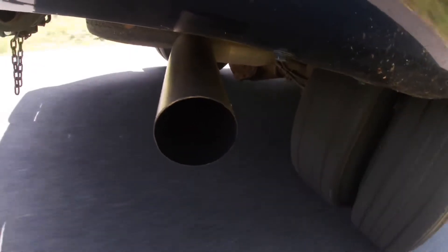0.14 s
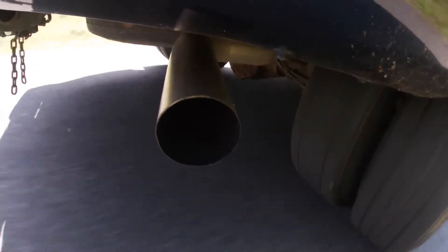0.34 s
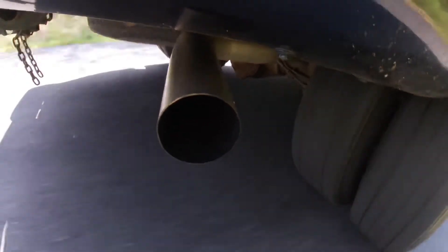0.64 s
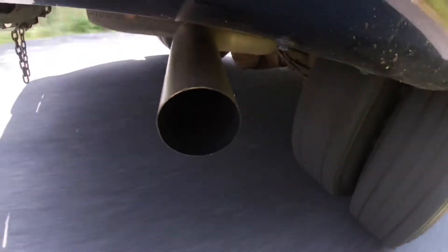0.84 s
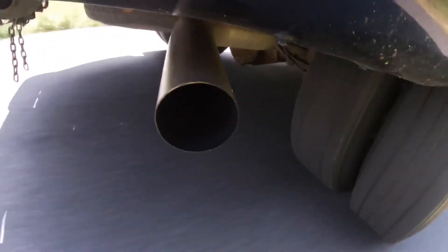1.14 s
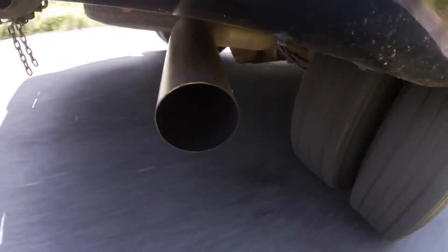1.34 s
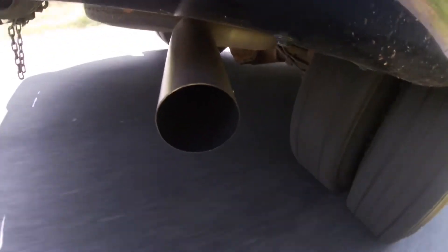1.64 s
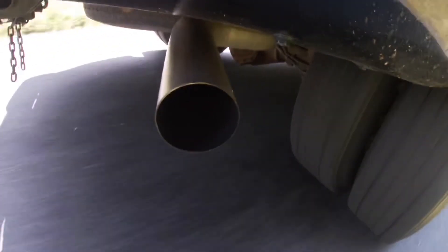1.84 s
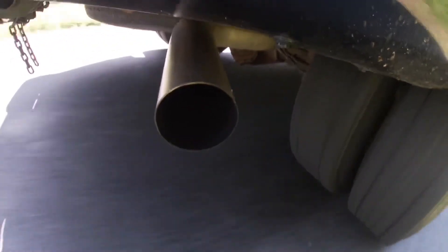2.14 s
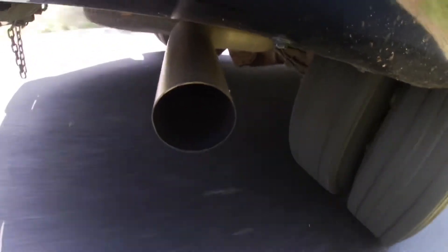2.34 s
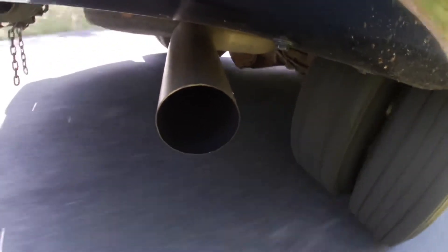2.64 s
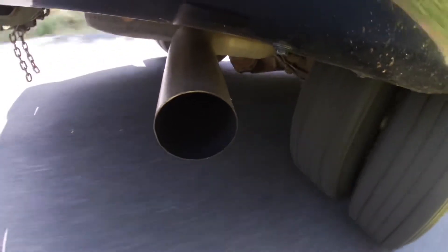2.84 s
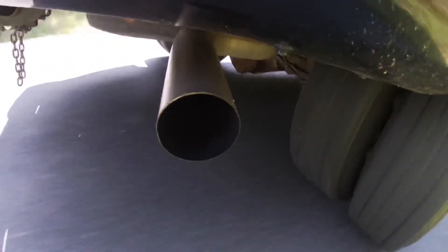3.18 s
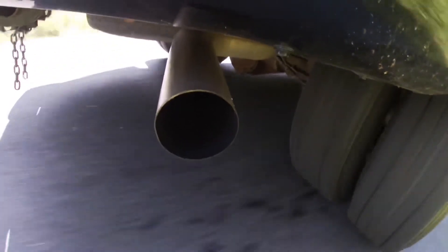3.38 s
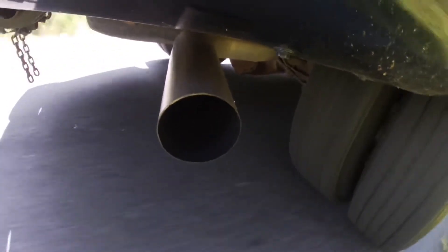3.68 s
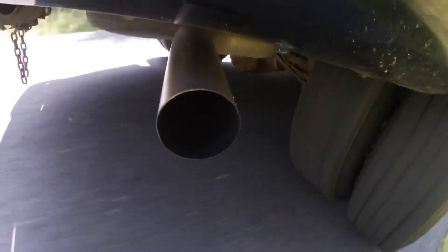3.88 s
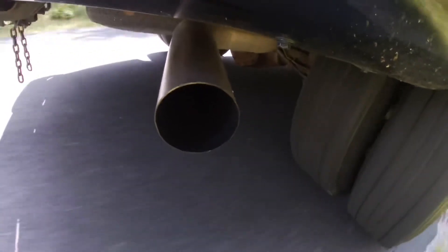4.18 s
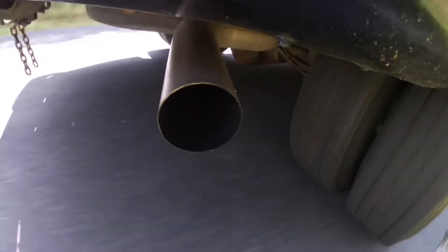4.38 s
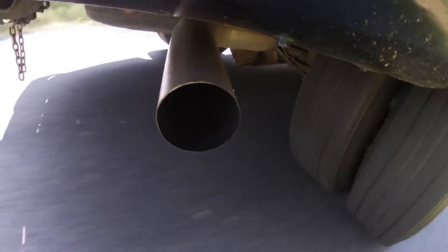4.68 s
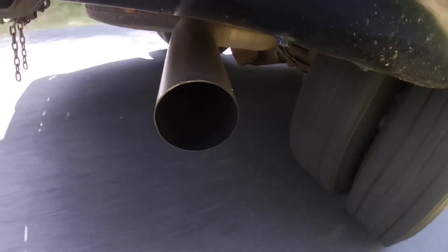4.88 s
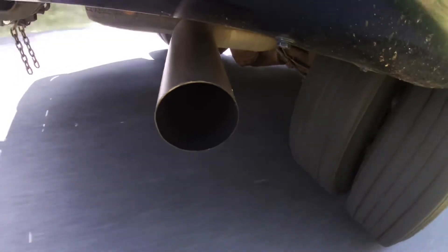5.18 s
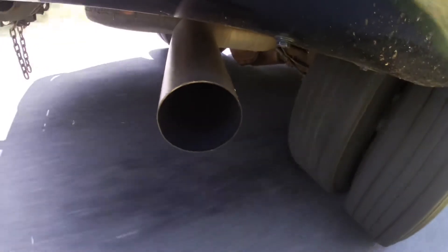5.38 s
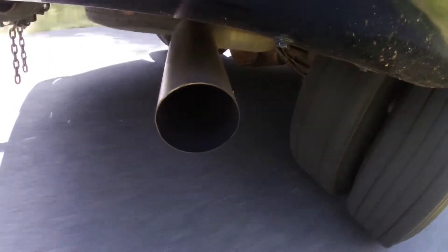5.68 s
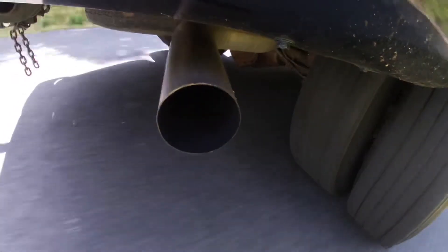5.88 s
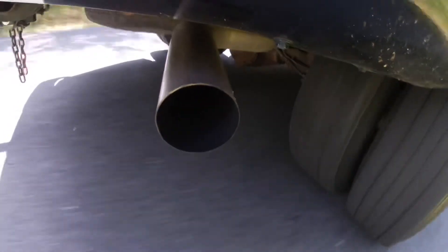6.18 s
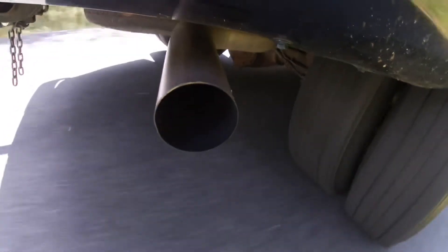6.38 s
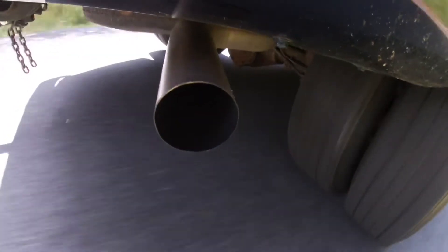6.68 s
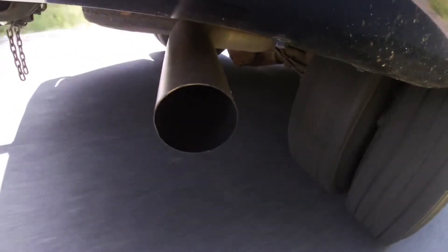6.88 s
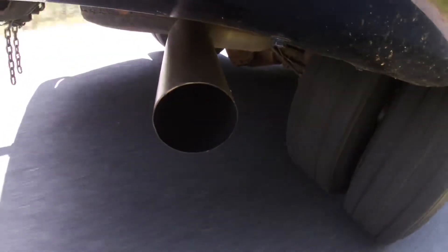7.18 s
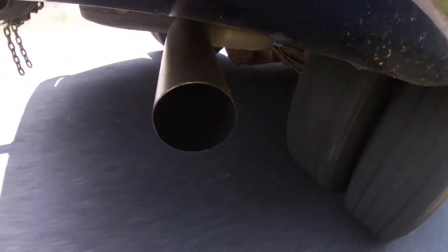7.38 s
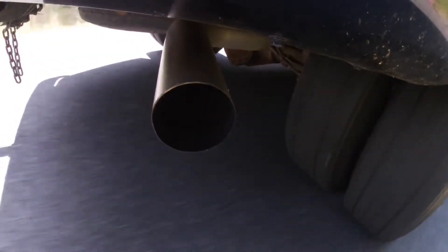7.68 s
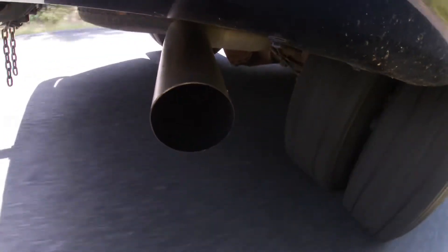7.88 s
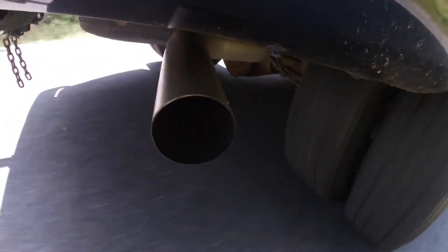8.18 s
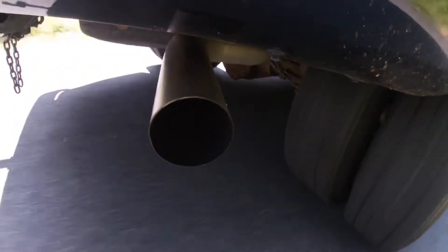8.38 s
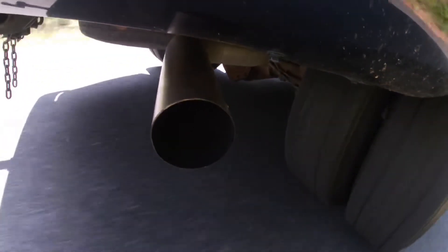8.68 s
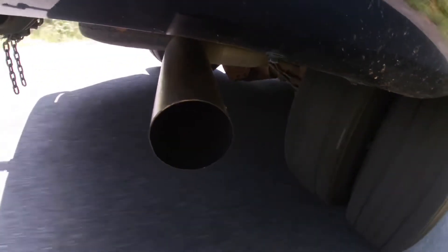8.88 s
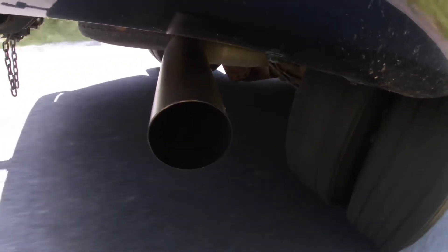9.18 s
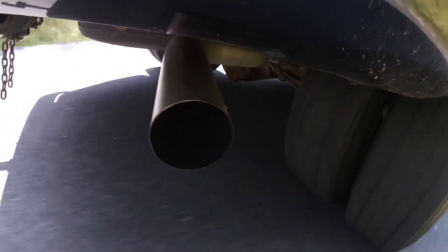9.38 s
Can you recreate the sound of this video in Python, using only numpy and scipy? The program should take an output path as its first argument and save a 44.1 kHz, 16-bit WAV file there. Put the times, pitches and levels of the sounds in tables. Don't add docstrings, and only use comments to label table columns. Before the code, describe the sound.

From 0 to 5 seconds a diesel pickup slows on asphalt, its exhaust a loud, deep, rounded drone near 107 hertz sinking to about 95, with slight uneven throbbing. Pulsing gas hiss, tyre hiss, low axle rumble and a hollow underbody roar surround it; a faint airy turbo whistle drifts downward. Wind thumps near 1.9 and 3.5 seconds, bumps knock around 3.3, 4 and 5.1, and fine metallic ticking grows from about 3.8 to 5. From 5 to 5.6 the revs jump to about 118 hertz, then load kicks in: a rougher, fuller growl with stronger hiss, gently sinking until 8.1. It eases into a lumpy lope, with a bump at 8.5 and gusts. From 8.8 to 9.5 gas rush and rising whistle swell over the drone. Close, muffled, slightly saturated microphone; the sound stops while still running.

```python
import sys
import numpy as np
from scipy import signal
from scipy.fft import rfft, irfft
from scipy.io import wavfile
from scipy.ndimage import uniform_filter1d

SR = 44100
rng = np.random.default_rng(int(sys.argv[2]) if len(sys.argv) > 2 else 0)


def field_ratio(decibels):
    return 10 ** (np.asarray(decibels, dtype=float) / 20)


def bounce(signal):
    frames = np.transpose(np.atleast_2d(signal))
    limited = np.clip(frames, -1, 1)
    pcm = np.round(limited * 32767).astype(np.int16)
    wavfile.write(sys.argv[1], SR, pcm)


N = 420273
SECONDS = np.arange(N) / SR

# time in seconds, jolt of the axle in dB, ring of the hollow in dB.
BUMPS = [(.05, 4, 2.5), (2.679, -2.5, 2.5), (3.1, 4, 4.5), (3.26, 11.5, 2.5), (3.98, 9, 3), (3.45, 3, 2.5),
         (4.16, 6, 6), (4.4, -1, 3.5), (4.59, 2, 0), (5.07, 8, 4), (5.39, -1, 3.5), (5.68, 9, 2),
         (7.46, 4, 1.5), (8.52, 13, 0.5), (8.79, 8, 2.5), (9.0, 1, 3), (9.24, 3.5, 1.5)]
BUMP_S = 0.042


def evened(x):
    return x / np.sqrt(np.mean(x ** 2) + 1e-20)


def curves(rows):
    s, *columns = np.transpose(rows)
    return [np.interp(SECONDS, s, column) for column in columns]


def during(spans):
    change_s = 0.07
    share = 0
    for start, end in spans:
        fade_in = np.clip((SECONDS - start) / change_s + 0.5, 0, 1)
        fade_out = np.clip((end - SECONDS) / change_s + 0.5, 0, 1)
        share = share + fade_in * fade_out
    return share


def swell(s, db, length):
    return db * np.exp(-((SECONDS - s) / length) ** 2)


def drift(top_hz):
    z = rfft(rng.standard_normal(N)) / (1 + (np.fft.rfftfreq(N, 1 / SR) / top_hz) ** 4)
    return evened(irfft(z, N))


def noise(spectrum, size, patchy_db):
    # centre in Hz, width in Hz, level in dB.
    case_rings = [(1070, 250, -3), (1668, 46, 3), (2540, 67, -4), (2635, 110, -5.5), (2893, 65, 3.5),
                  (3230, 130, -4.5), (3984, 160, 4), (4320, 130, -2.5), (4820, 180, 5), (8080, 440, 3),
                  (10100, 300, 0.5)]
    frames, hz = 4 * N // size + 5, np.fft.rfftfreq(size, 1 / SR)
    real, imaginary, patches = rng.standard_normal((frames, len(hz), 3)).T
    patches = uniform_filter1d(patches, size=6, axis=0)
    patches = evened(uniform_filter1d(patches, size=14, axis=1))
    f, db = np.transpose(spectrum)
    colour_db = np.interp(np.log(hz + 1), np.log(f + 1), db, left=-90, right=-120)
    for centre, width, ring_db in case_rings:
        colour_db = colour_db + ring_db * np.exp(-((hz - centre) / width) ** 2)
    z = (real + 1j * imaginary) * field_ratio(colour_db[:, None] + patchy_db * patches)
    return evened(signal.istft(z, nperseg=size, noverlap=3 * size // 4)[1][:N])


def resonate(x, hz, width_hz):
    turn = np.exp(2j * np.pi * np.cumsum(hz) / SR)
    r = np.exp(-np.pi * width_hz / SR)
    return 2 * (turn * signal.lfilter([(1 - r) ** 2], [1, -2 * r, r * r], x / turn)).real


def drone(firings, flow_db):
    # start in seconds, end in seconds.
    loping_spans = [
        (5.02, 5.6),
        (8.17, 9.9),
    ]
    # start in seconds, end in seconds.
    pulling_spans = [
        (5.6, 8.17),
    ]
    # order in eighths of the firing rate, then level in dB rms while slowing,
    # while pulling, while loping.
    uneven = [(4, -50.5, -54, -37.5), (5, -51.5, -36, -43), (6, -53.5, -32, -26), (7, -32.5, -32, -33),
              (9, -27, -26, -27.5), (10, -33.5, -27.5, -24), (11, -29.5, -29.5, -45), (12, -42, -36, -31.5),
              (13, -41, -42, -38.5), (14, -43.5, -33, -34), (15, -47.5, -31.5, -40),
              (16, -37.5, -39.5, -32.5), (17, -49.5, -43, -38), (18, -45, -39, -43.5),
              (19, -47.5, -59.5, -37), (20, -49.5, -45, -53.5), (22, -52, -36.5, -40.5),
              (23, -57.5, -36, -44), (24, -45.5, -44.5, -43.5), (26, -46, -46, -48), (29, -52, -47, -53),
              (30, -53.5, -50, -61), (31, -50.5, -42.5, -49)]
    pulling, loping = during(pulling_spans), during(loping_spans)
    slowing = np.clip(1 - pulling - loping, 0, 1)

    slow_tone_db = -11.5 - 0.28 * SECONDS
    lope_tone_db = -15 - 0.43 * np.clip(flow_db + 3, 0, 11)
    firing_db = slowing * slow_tone_db + pulling * -11.5 + loping * lope_tone_db
    firing_db = firing_db + swell(5.65, 2.5, 0.06)
    out = field_ratio(firing_db + 0.3 * drift(9)) * np.cos(2 * np.pi * firings)

    for order, slow_db, pull_db, lope_db in uneven:
        sag_db = 0.13 * (order < 11.5) * np.clip(flow_db - 2.0, 0, 12)
        level = slowing * field_ratio(slow_db - 1.3) + pulling * field_ratio(pull_db + 0.6)
        level = level + loping * field_ratio(lope_db + 1.46 - sag_db)
        wander = rng.random() + 0.015 * drift(4.4)
        if order in (7, 9):
            wander = 0.46 * (order < 8) + 0.017 * drift(3.0)
        out += level * field_ratio(0.42 * drift(4.8)) * np.cos(2 * np.pi * (order * firings / 8 + wander))
    return np.sqrt(2) * out


def gas(firings, flow_db):
    # frequency in Hz, level in dB per Hz.
    low_hiss = [(1000, -29.5), (1400, -3.5), (1900, -0.5), (2500, 0), (3100, -7.5), (3500, -23)]
    high_hiss = [(3000, -25.5), (3400, -8), (4400, -2), (5200, -4.5), (5800, -11.5), (6700, -16),
                 (7100, -23.5), (7600, -38.5)]
    top_hiss = [(6700, -21), (7200, -3.5), (8700, -0.5), (9400, -11), (10600, -10), (11200, -21.5),
                (13400, -22), (14300, -37)]
    jet_colour = [(1600, -25), (2200, 0.5), (2900, 1.5), (3300, -6), (4000, -4.5), (4900, -1.5), (5800, -9),
                  (7000, -32.5)]
    flutter_db = 0.61 * drift(33)
    low_puffs = 1 + 0.12 * np.cos(2 * np.pi * (firings + 0.088))
    high_puffs = 1 + 0.13 * np.cos(2 * np.pi * (firings - 0.3))
    low = noise(low_hiss, size=1024, patchy_db=0.5) * low_puffs * field_ratio(0.8 * drift(40))
    high = noise(high_hiss, size=1024, patchy_db=0.8) * high_puffs
    top = noise(top_hiss, size=1024, patchy_db=1.0)
    jet = noise(jet_colour, size=1024, patchy_db=2.8)
    out = field_ratio(-40.5 + 0.87 * flow_db) * low
    out += field_ratio(-42.5 + 0.83 * flow_db) * high
    out += field_ratio(-63.5 + flow_db) * top
    out += field_ratio(-54 + 1.99 * flow_db) * jet
    return field_ratio(flutter_db) * out


def turbo(firings, flow_db):
    # time in seconds, frequency in Hz, level in dB.
    whistle_curve = [(0, 6050, -49.5), (0.6, 5900, -55), (1.6, 5780, -56.5), (2.3, 5450, -50),
                     (3.0, 5330, -54), (3.9, 5220, -53), (4.4, 5240, -48), (4.97, 5110, -48),
                     (5.1, 4830, -54), (5.5, 4820, -44), (6.1, 5030, -52.5), (6.6, 5370, -55.5),
                     (8.1, 5670, -59), (8.28, 5660, -52), (8.6, 5380, -59.5), (8.9, 5270, -57),
                     (9.25, 5940, -42), (9.53, 6500, -46.5)]
    hz, db = curves(whistle_curve)
    air = rng.standard_normal((2, N))
    muffle_db = 13 * np.clip(abs(2 * hz - 10350) / 1000, 0, 1)
    spool_db = 2.2 * np.maximum(flow_db - 5.5, 0)
    octave_db = -75.5 + spool_db - muffle_db + 2.6 * drift(6)
    whistle = field_ratio(db) * evened(resonate(air[0], hz, width_hz=320))
    octave = field_ratio(octave_db) * evened(resonate(air[1], 2 * hz, width_hz=380))
    return (whistle + octave) * (1 + 0.2 * np.cos(2 * np.pi * (firings - 0.3)))


def wind():
    # frequency in Hz, level in dB per Hz.
    buffet = [(12, -17), (22, -0.5), (45, 0.5), (70, -2.5), (110, -3), (170, -24), (260, -25)]
    # time in seconds, level in dB over the breeze, length in seconds.
    gusts = [(.75, 1, .15), (1.864, 9, 0.034), (2.12, 0, .15), (2.676, 5.5, .05), (3.449, 8.5, 0.18),
             (3.98, 0, 0.031), (4.174, 5, 0.036), (4.382, 6, 0.04), (5.07, 3, .05), (5.5, 6.5, .12),
             (6.078, 2, 0.088), (7.46, 1, .05), (8.1, 4, 0.089), (8.442, 7, 0.086), (8.735, 8, 0.065),
             (9.2, 12, 0.2)]
    wind_db = -29.5 + sum(swell(*gust) for gust in gusts)
    return field_ratio(wind_db + 4.0 + 1.6 * drift(2.4)) * noise(buffet, size=4096, patchy_db=3.1)


def rumble(coarse_db):
    # frequency in Hz, level in dB per Hz.
    axle = [(80, -13), (130, -4.6), (200, -3.1), (280, -3), (340, -7.5), (400, -27.5)]
    rumble_db = -32.5 + coarse_db + sum(swell(s, jolt_db, BUMP_S) for s, jolt_db, _ in BUMPS)
    return field_ratio(rumble_db + 2.0 + 1.1 * drift(17)) * noise(axle, size=2048, patchy_db=2.0)


def hollow(flow_db, coarse_db):
    # frequency in Hz, level in dB per Hz.
    roar = [(300, -22), (370, -8), (430, 0.5), (470, -4), (520, -0.5), (580, -9.5), (680, -18)]
    roar_db = -32 + 0.17 * flow_db + 0.12 * coarse_db
    roar_db = roar_db + sum(swell(s, ring_db, BUMP_S) for s, _, ring_db in BUMPS)
    return field_ratio(roar_db + 0.98 * drift(21)) * noise(roar, size=2048, patchy_db=0.5)


def tread(flow_db):
    # frequency in Hz, level in dB per Hz.
    tread_colour = [(500, -16.5), (620, -2), (900, -0.3), (1300, -2.5), (1800, -7), (2600, -21)]
    tread_db = -38.5 + 0.43 * flow_db - 0.35 * SECONDS + 0.6 * drift(6.1)
    return field_ratio(tread_db + 2.5) * noise(tread_colour, size=1024, patchy_db=0.35)


def electronics():
    # frequency in Hz, level in dB rms.
    hum = [(11600, -99), (11803, -89.5)]
    return sum(np.sqrt(2) * field_ratio(db) * np.sin(2 * np.pi * hz * SECONDS) for hz, db in hum)


def ticks(firings):
    # time in seconds, level in dB.
    tick_levels = [(0, -62), (3.4, -58), (3.85, -46), (4.6, -42), (4.96, -45), (5.03, -63), (9.53, -63)]
    clicks = np.diff(np.floor(firings), prepend=0) * field_ratio(1.5 * drift(60))
    fuzz = 0.015 * rng.standard_normal(N)
    ring = resonate(clicks + fuzz, np.full(N, 5030), width_hz=260)
    return field_ratio(curves(tick_levels)[0]) * evened(ring)


def scene():
    # time in seconds, firings per second.
    speed = [(0.0, 106.7), (1.5, 105.4), (3.0, 100.9), (4.2, 97.7), (4.95, 94.5), (5.02, 96.8),
             (5.16, 103.9), (5.44, 114.1), (5.58, 117.5), (5.8, 119.7), (6.0, 118.5), (6.4, 116.9),
             (8.05, 112.7), (8.15, 113.5), (8.45, 112.7), (8.85, 114.5), (9.15, 117.8), (9.53, 118.5)]
    # time in seconds, gas flow in dB.
    flow = [(0, 1.5), (.37, 2), (1.64, 0.5), (2.33, 2.5), (2.5, 1), (4.6, 1.5), (4.94, 0), (5.07, -3),
            (5.55, 2), (5.65, 7.5), (5.81, 7), (7.27, 3.5), (8.07, 3), (8.17, -2), (8.41, -2), (8.81, 5),
            (9.13, 14), (9.53, 16)]
    # time in seconds, coarseness of the asphalt in dB.
    surface = [(0, 2.5), (.35, 3), (.7, -6.5), (1.35, 4), (2.1, -11.5), (2.8, 4), (3.7, -3), (4.9, -0.5),
               (5.7, 4.5), (6.8, 2.5), (7.8, -8), (9.0, 0.5), (9.53, 5.5)]
    firings = np.cumsum(curves(speed)[0] * (1 + 0.0008 * drift(9.5))) / SR
    flow_db, coarse_db = curves(flow)[0], curves(surface)[0]
    truck = drone(firings, flow_db) + gas(firings, flow_db) + turbo(firings, flow_db)
    road = wind() + rumble(coarse_db) + hollow(flow_db, coarse_db) + tread(flow_db)
    return (truck + road + electronics() + ticks(firings))[None]


def roll_off(x):
    return signal.sosfilt(signal.butter(12, 14230, fs=SR, output="sos"), x)


def record(dry):
    power = uniform_filter1d(uniform_filter1d(dry ** 2, size=900), size=900)
    power_db = 10 * np.log10(abs(power) + 1e-9)
    even = dry / field_ratio(0.25 * np.maximum(power_db + 12.5, 0))
    return roll_off(0.9 * np.tanh(even / 0.9))


dry = scene()
out = record(dry)
bounce(out)
```